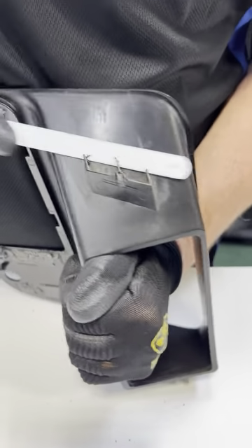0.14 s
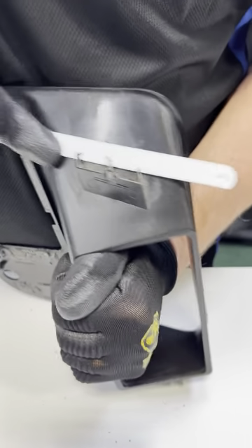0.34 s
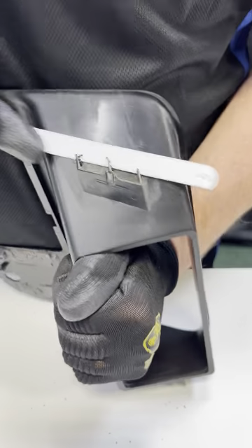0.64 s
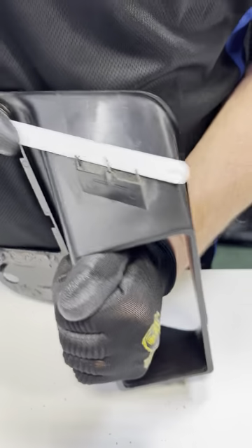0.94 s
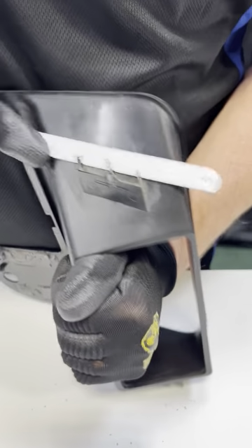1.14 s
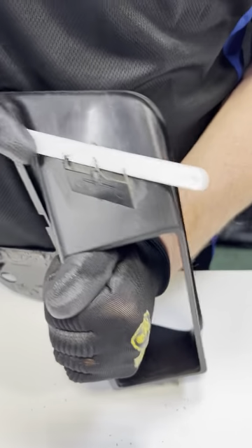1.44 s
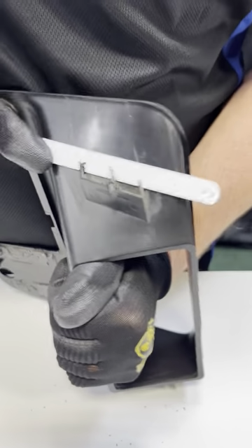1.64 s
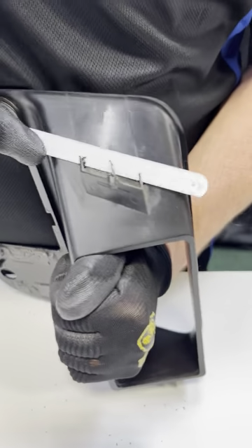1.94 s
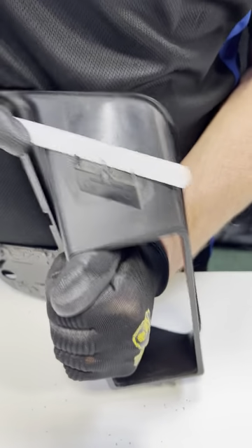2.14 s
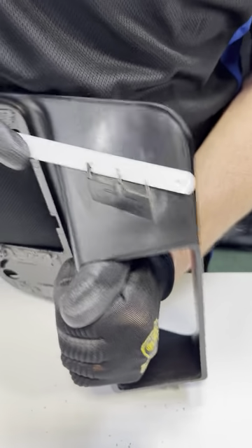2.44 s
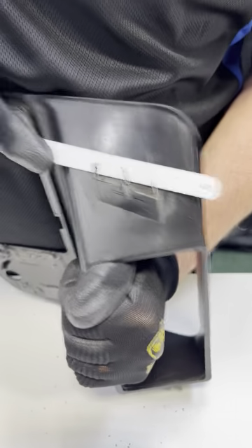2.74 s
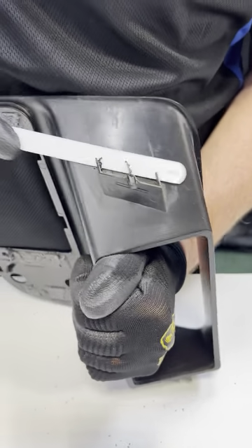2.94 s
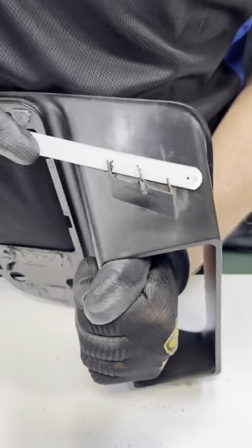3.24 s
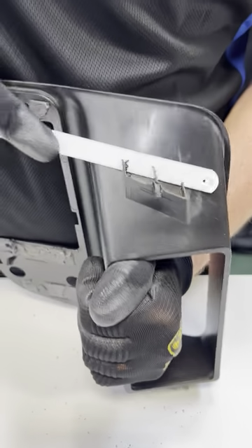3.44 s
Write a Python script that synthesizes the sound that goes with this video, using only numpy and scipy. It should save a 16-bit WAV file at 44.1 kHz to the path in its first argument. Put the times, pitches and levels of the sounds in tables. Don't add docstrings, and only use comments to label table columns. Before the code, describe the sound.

A bare hacksaw blade saws hollow plastic in quick rasping strokes, then catches and slows.

```python
import sys
import numpy as np
from scipy import signal
from scipy.fft import rfft, irfft
from scipy.io import wavfile
from scipy.ndimage import uniform_filter1d

SR = 44100
rng = np.random.default_rng(int(sys.argv[2]) if len(sys.argv) > 2 else 0)


def boost(x):
    u = np.asarray(x, float) / 20
    return 10 ** u


def put_to_file(sound):
    columns = np.atleast_2d(sound).T
    safe = np.clip(columns, -1, 1)
    whole_steps = np.round(safe * 32767)
    wavfile.write(sys.argv[1], SR, whole_steps.astype(np.int16))


N = 158760


def level(x):
    return x / np.sqrt(np.mean(x ** 2))


def band(x, hz, width):
    return signal.lfilter(*signal.iirpeak(hz, hz / width, fs=SR), x)


def colour(x, table):
    hz, db = np.array(table, float).T
    f = np.maximum(np.arange(N // 2 + 1) * SR / N, 1)
    octaves_below = np.maximum(np.log2(hz[0] / f), 0)
    gain_db = np.interp(np.log(f), np.log(hz), db) - 9 * octaves_below
    return irfft(rfft(x) * boost(gain_db), N)


def walk(rate):
    k = int(SR / rate)
    steps = np.repeat(rng.standard_normal(N // k + 1), k)
    smooth = uniform_filter1d(uniform_filter1d(steps, k), k)
    return level(smooth[:N])


def arch(u, peak):
    bend = np.log(.5) / np.log(np.clip(peak, .2, .8))
    return np.sin(np.pi * u ** bend) * (u < 1)


# pitch_hz [Hz], level_db [dB per Hz]
AIR_TONE = [(300, -3.5), (700, -12), (2000, -9.5), (2600, -15.5), (6000, -11.5), (7000, -19.5),
            (11000, -22), (16000, -50)]


def air():
    noise = [level(colour(rng.standard_normal(N), AIR_TONE)) for _ in range(2)]
    return np.array(noise) * boost(-63.5 + 2.8 * walk(13))


def tooth_strikes(start, length, top_hz, peak, jitter, scatter_db, patchy_db, sharp):
    chance, t = rng.standard_normal((400, 2)), np.arange(N) / SR
    u = np.clip((t - start) / (length * 1.05), 0, 1)
    force = arch(u, peak) ** sharp * boost(patchy_db * walk(90))
    speed = arch(u, .4) ** .5 * (1 + .025 * walk(120))
    teeth_passed = np.cumsum(top_hz * speed) / SR
    teeth = np.arange(1, min(int(teeth_passed[-1]), 400))
    skid = 1 + 3 * np.exp(-teeth / 7.)
    at = np.interp(teeth + skid * jitter * chance[teeth, 0], teeth_passed, np.arange(N))
    i = np.clip(at.astype(int), 0, N - 2)
    size = force[i] * boost(scatter_db * chance[teeth, 1]) * np.sqrt(SR / top_hz)
    pulses = np.zeros(N)
    np.add.at(pulses, i, size * (1 - at + i))
    np.add.at(pulses, i + 1, size * (at - i))
    return pulses, force, u


def stroke(start, length, db, scrape_db, top_hz, peak, tilt_db, **manner):
    pulses, force, u = tooth_strikes(start, length, top_hz, peak, **manner)
    grit = .13 * force * rng.standard_normal(N)
    blows = boost(db) * (pulses + grit)
    chip = np.exp(-np.arange(200) / SR / 0.00019)
    steady = 0.33 * force * boost(2.6 * walk(250))
    puffs = 0.16 * np.convolve(pulses, chip)[:N]
    gate = boost(db + scrape_db) * boost(tilt_db * u) * (steady + puffs)
    return np.array([blows, gate])


# start_s [s], length_s [s], level_db [dB], scrape_db [dB re level]
LIGHT_DRAGS = [(-.03, 0.048, -26.5, -3), (.0, 0.15, -47.5, -6), (0.166, 0.11, -48.5, 0),
               (0.56, 0.039, -56, -30), (0.592, 0.058, -44.5, -7), (1.928, .09, -55, -6.5),
               (2.003, 0.11, -50, -5), (2.138, 0.069, -39, 0.5), (2.37, .06, -55.5, -7),
               (2.458, 0.2, -59.5, 1), (2.61, 0.044, -46, -2.5), (2.772, 0.15, -48.5, -3),
               (2.911, 0.049, -40.5, 0.5), (2.952, .18, -51.5, -1), (3.161, 0.07, -57, -17),
               (3.213, 0.055, -64.5, -7), (3.283, 0.064, -57, 5), (3.331, 0.055, -66, -5.5),
               (3.459, .1, -51, 5), (3.586, 0.04, -54, 3)]


def drags():
    return sum(stroke(start, length, db, scrape_db, top_hz=872, peak=.5, tilt_db=-1,
                      jitter=.6, scatter_db=4, patchy_db=3, sharp=1.3)
               for start, length, db, scrape_db in LIGHT_DRAGS)


# pitch_hz [Hz], width_hz [Hz], level_db [dB]
SHELL_MODES = [(390, 190, -1.5), (657, 241, 1.5), (872, 125, 5), (1039, 253, 1.5), (1303, 181, 2),
               (1724, 290, -5), (2089, 224, -1.5), (2666, 200, -13.5), (3108, 210, -14.5),
               (3750, 130, -29.5), (4225, 200, -17.5)]


def ring_modes(x):
    return sum((-1) ** k * boost(db) * band(x, hz, 0.67 * width)
               for k, (hz, width, db) in enumerate(SHELL_MODES))


def shell(blows):
    out = ring_modes(blows) / np.std(ring_modes(rng.standard_normal(N)))
    return signal.sosfilt(signal.butter(4, 430, "high", fs=SR, output="sos"), out)


# pitch_hz [Hz], level_db [dB per Hz]
CHIP_TONE = [(1470, 11.5), (2500, 11), (3340, 6.5), (6420, 4.5), (7060, -2.5), (11100, 0), (15200, -12.5),
             (16400, -56)]
# pitch_hz [Hz], width_hz [Hz], level_db [dB]
BLADE_MODES = [(6160, 31, 4.5), (7350, 210, 0.5), (7750, 130, -4), (8900, 32, 2.5), (10980, 84, -1.5)]


def chips_and_blade(x):
    steel = sum(boost(db) * band(x, hz, 3 * width) for hz, width, db in BLADE_MODES)
    return colour(x, CHIP_TONE) + boost(-5.5) * steel


def scrape(gate):
    noise = gate * rng.standard_normal(N)
    return chips_and_blade(noise) / np.std(chips_and_blade(rng.standard_normal(N)))


def jolt(blows):
    return boost(-2) * band(band(blows, 242, 140), 242, 173)


# pitch_hz [Hz], width_hz [Hz], level_db [dB]
HAND_MODES = [(46, 17, -19), (80.2, 5.4, -4.5), (115, 65, 0.5), (181, 6.7, -6), (218, 53, -9.5),
              (246, 19, -6), (272, 67, -15.5)]
# time_s [s], wobble_db [dB]
GRIP_LEVEL = [(0.0, -35.5), (0.35, -44), (0.58, -36), (0.94, -43.5), (1.19, -40), (1.37, -39), (1.94, -42),
              (2.93, -39), (3.08, -44.5), (3.29, -57.5), (3.6, -54)]


def wobble(blows):
    shake = np.roll(uniform_filter1d(np.abs(blows), int(0.016 * SR)), int(0.025 * SR))
    shake = boost(9 * np.tanh(shake / np.mean(shake)))
    out = np.zeros(N)
    for hz, width, db in HAND_MODES:
        noise = shake * rng.standard_normal(N)
        mode = level(band(band(noise, hz, 1.8 * width), hz, 2.6 * width))
        out += boost(db + 2.9 * walk(9.3)) * mode
    rumble = level(band(band(rng.standard_normal(N), 52, 65), 62, 110))
    s, db = np.array(GRIP_LEVEL).T
    grip_db = np.interp(np.arange(N) / SR, s, db) + 2.0 * walk(13) + 3.5
    return level(out + 0.74 * rumble) * boost(grip_db)


# pitch_hz [Hz], side_db [dB re mid]
PORT_SPREAD = [(60, -37), (150, -48), (300, -12.5), (1000, -17.5), (2500, -8), (4000, -12), (8000, -0.5),
               (14000, -2)]


def ports(x):
    return colour(np.imag(signal.hilbert(x)), PORT_SPREAD)


def room(x):
    t, t60_s = np.arange(SR // 2) / SR, 0.31
    tail = rng.standard_normal((2, len(t))) * boost(-60 * t / t60_s) * (t > .004)
    tail = signal.lfilter([.3], [1, -.7], tail)
    return signal.fftconvolve(x[None], tail / np.sqrt(np.sum(tail[0] ** 2)), axes=1)[:, :N]


# start_s [s], length_s [s], level_db [dB], scrape_db [dB re level], top_tooth_rate_hz [Hz]
PUSH_STROKES = [
    (0.085, 0.075, -13.5, -15.5, 683.2),
    (0.359, 0.086, -15.5, -10, 658.2),
    (0.637, 0.073, -20.5, -9.5, 562.3),
    (0.901, 0.067, -17, -17.5, 600),
    (1.155, 0.074, -22, -10, 683.4),
    (1.433, 0.07, -19, -11.5, 682.4),
    (1.73, 0.071, -18, -12.5, 693.3),
    (2.863, 0.061, -18.5, -13.5, 642.4),
]


def pushes():
    return sum(stroke(start, length, db, scrape_db, top_hz, peak=.5, tilt_db=7,
                      jitter=.05, scatter_db=2.5, patchy_db=2, sharp=.6)
               for start, length, db, scrape_db, top_hz in PUSH_STROKES)


# start_s [s], level_db [dB], pitch_hz [Hz], length_ms [ms]
SHELL_RINGS = [(0.095, -11.5, 1017, 5.8), (0.113, -4.5, 743, 5.4), (0.127, -4, 1318, 6.4),
               (0.145, -6.5, 916, 8.2), (0.236, -10, 798, 7.9), (0.243, -8, 2106, 6.5),
               (0.373, -6.5, 1010, 5.1), (0.396, -4.5, 633, 6.8), (0.424, -9, 1015, 6),
               (0.507, -15.5, 1320, 6.7), (0.518, -8, 1800, 6.3), (0.531, -10.5, 1040, 6.6),
               (0.639, -21, 813, 3.7), (0.657, -12, 980, 7), (0.679, -12.5, 1005, 7), (0.689, -17, 880, 7),
               (0.776, -11.5, 1800, 6), (0.79, -7.5, 1746, 3.6), (0.802, -15.5, 873, 6.2),
               (0.909, -12, 880, 5.5), (0.926, -11, 567, 6.6), (0.939, -9.5, 587, 7),
               (0.954, -11, 936, 7.1), (1.012, -18, 856, 8.1), (1.026, -9.5, 1020, 6.6),
               (1.044, -16.5, 856, 8.3), (1.166, -17, 1018, 8.8), (1.18, -12.5, 680, 8.5),
               (1.196, -6, 660, 10), (1.21, -12.5, 545, 7.3), (1.3, -11.5, 1253, 8.1),
               (1.318, -9, 1226, 7.7), (1.329, -8, 2034, 6.2), (1.445, -13.5, 995, 5.5),
               (1.463, -8.5, 679, 7.1), (1.584, -10.5, 1758, 7.4), (1.604, -9.5, 920, 6.2),
               (1.616, -15.5, 873, 6.3), (1.742, -6, 1020, 4.4), (1.759, -11, 2142, 6.1),
               (1.774, -12.5, 856, 5.9), (1.87, -22.5, 856, 7), (1.895, -10.5, 870, 9.7),
               (2.311, -8.5, 983, 6.6), (2.451, -17.5, 1240, 7.9), (2.747, -19.5, 1030, 9.9),
               (2.876, -12.5, 954, 7), (2.888, -6.5, 663, 7.7)]


def rings():
    out, t = np.zeros(N + 4000), np.arange(4000) / SR
    for at, db, hz, ms in SHELL_RINGS:
        u = t / (ms / 1000)
        waver = uniform_filter1d(rng.standard_normal((2, 4000)), 60, axis=1) * np.sqrt(60)
        turns = np.cumsum(hz * (1 - 0.036 * (u - 1) + 0.044 * waver[0])) / SR
        swell = boost(db - 6.5 + 1.53 * waver[1]) * u * np.exp(1 - u ** 1.48)
        i = int(at * SR)
        out[i:i + 4000] += swell * np.sin(2 * np.pi * turns)
    return out[:N]


# start_s [s], crack_db [dB], knock_db [dB], length_ms [ms]
TOOTH_SNAGS = [(0.11, -13, -5, 2.6), (0.2562, 1, -12, 1.58), (0.264, -16, -55.5, 2.9),
               (0.3988, -13.5, -3, 3.2), (0.4152, -7, -9.5, 2.2), (0.5152, -14, -7.5, 1.76),
               (0.5362, -28, -4.5, 1.2), (0.7909, -41, -12, 2.2), (1.0254, -4.5, -15, 1.2),
               (1.3338, -11, -6, 1.5), (1.585, -33, -18.5, 6.3), (1.6084, -26.5, -5.5, 1.4),
               (1.8933, -11, -4, 2.7), (2.0228, -36.5, -47, 1.7), (2.3103, -30.5, -23.5, 4.6),
               (2.334, -34, -14, 3.8), (2.4193, -18.5, -19.5, 3.8), (2.4321, -20, -24, 4),
               (2.455, -19.5, -24, 4.7), (2.7172, -7, -20, 3.2), (2.8874, -17, -7.5, 3.4),
               (3.0158, -13, -18, 3.06), (3.059, -33, -31.5, 1.5), (3.0849, -35, -48, 3.8),
               (3.1967, -45.5, -67, 4.2), (3.3895, -36.5, -44.5, 4.3), (3.5231, -30.5, -21.5, 0.61)]


def snags():
    t = np.arange(N) / SR
    blows, gate = np.zeros(N), np.zeros(N)
    waver, ragged = .1 * walk(300), boost(4.5 * walk(900))
    for at, crack_db, knock_db, ms in TOOTH_SNAGS:
        u = (t - at) / (ms / 1000) - 1
        burst = np.exp(-u ** 2 * np.where(u < 0, 2.5, .8))
        chatter_hz = 966 * (1 + 0.07 * rng.standard_normal() + waver)
        slips = np.diff(np.floor(np.cumsum(chatter_hz) / SR), prepend=0)
        blows += boost(knock_db - 5.5) * burst * (6 * slips + .5 * rng.standard_normal(N))
        gate += boost(crack_db - 10) * burst ** 2.5 * ragged
    return np.array([blows, gate])


# start_s [s], length_s [s], level_db [dB], scrape_db [dB re level], most_force_at [0-1]
PULL_STROKES = [(0.211, 0.077, -19, -3.5, 0.47), (0.484, 0.081, -21, -5.5, 0.42),
                (0.744, 0.07, -22, -4.5, 0.58), (1.002, 0.074, -21, -6.5, 0.41),
                (1.255, 0.093, -21.5, -4.5, 0.67), (1.556, 0.079, -22, -6, 0.41),
                (1.853, 0.086, -23.5, -6.5, 0.53), (2.277, .09, -26.5, -10, 0.54),
                (2.442, 0.026, -22.5, -7, 0.42), (2.697, 0.032, -23.5, -4, 0.72),
                (2.731, 0.037, -25, -4.5, 0.51)]


def pulls():
    return sum(stroke(start, length, db, scrape_db, top_hz=600, peak=peak, tilt_db=3,
                      jitter=.2, scatter_db=4, patchy_db=3, sharp=1.05)
               for start, length, db, scrape_db, peak in PULL_STROKES)


# start_s [s], level_db [dB], pitch_hz [Hz]
HAND_BUMPS = [(0.355, -25, 167), (0.545, -24.5, 109), (0.637, -25.5, 254), (0.897, -29, 166),
              (1.057, -26, 112), (1.34, -30.5, 91.5), (1.594, -34, 84.5), (1.79, -21.5, 264),
              (1.892, -27.5, 269), (2.054, -33, 163), (2.183, -25.5, 114), (2.291, -21.5, 237),
              (2.43, -26, 86.5), (2.731, -26.5, 85.4), (2.863, -23, 161), (3.024, -32, 101),
              (3.482, -42, 70.0), (2.455, -17.5, 415), (2.72, -18.5, 477)]


def bumps():
    out, t = np.zeros(N + 8000), np.arange(8000) / SR
    for at, db, hz in HAND_BUMPS:
        u, i = t * hz / 2.74 * 2, int(at * SR)
        out[i:i + 8000] += boost(db - 4) * u * np.exp(1 - u) * np.sin(2 * np.pi * hz * t)
    return out[:N]


def scene():
    blows, gate = drags() + pushes() + snags() + pulls()
    tones, hiss, noise = rings(), scrape(gate), air()
    body = boost(-2.5) * shell(blows) + tones
    near = body + hiss
    low = boost(-1.5) * wobble(blows) + bumps()
    side = ports(near + low) + boost(-10) * scrape(gate)
    side += boost(-32.5) * np.roll(body, 60) + .5 * noise[1]
    pan = boost(np.array([[1.7], [-1.7]]) / 2)
    direct = (body + jolt(blows)) * pan + hiss + side * np.array([[1], [-1]])
    return direct + boost(-21.5) * room(near - .7 * tones) + low + noise[0]


def band_limit(x):
    return signal.sosfilt(signal.butter(12, 16510, fs=SR, output="sos"), x)


def record(dry):
    rounded = np.tanh(dry)
    mix = signal.sosfilt(signal.ellip(8, .2, 60, 16250, fs=SR, output="sos"), rounded)
    return band_limit(mix)


dry = scene()
out = record(dry)
put_to_file(out)
```